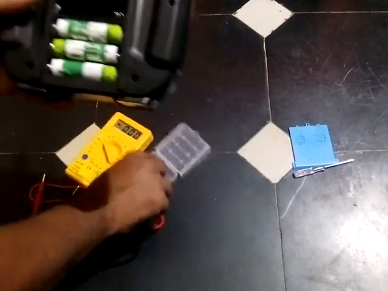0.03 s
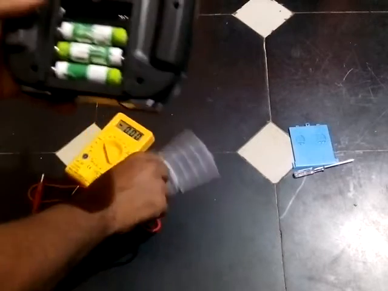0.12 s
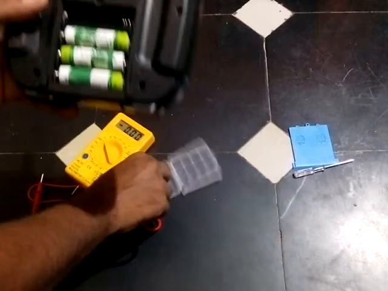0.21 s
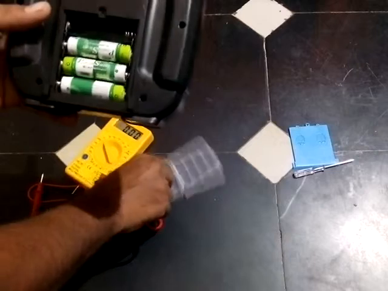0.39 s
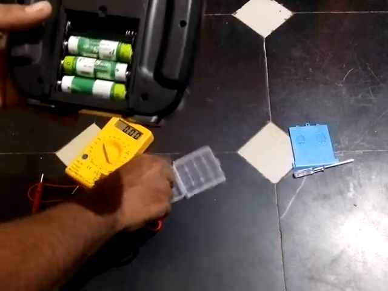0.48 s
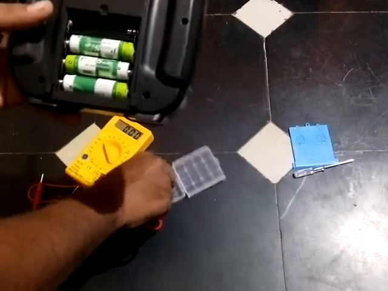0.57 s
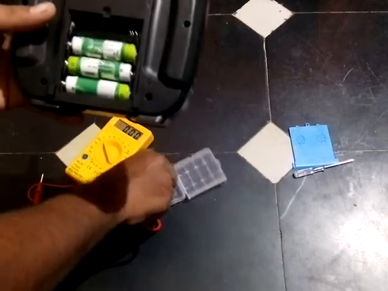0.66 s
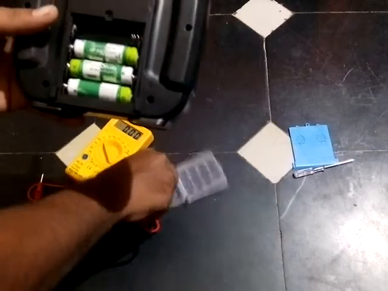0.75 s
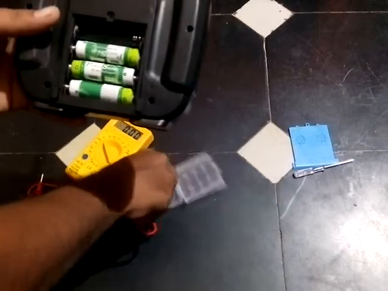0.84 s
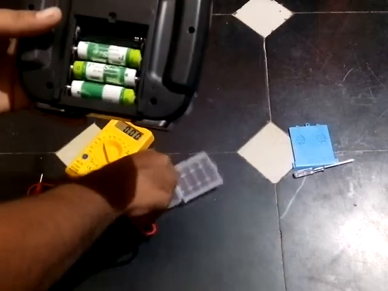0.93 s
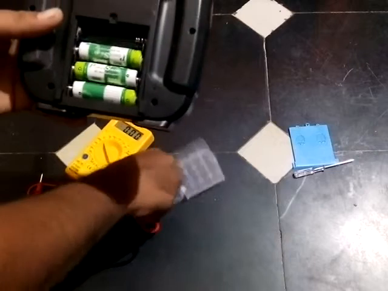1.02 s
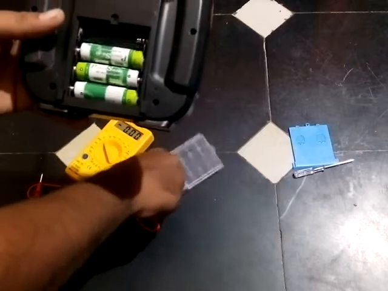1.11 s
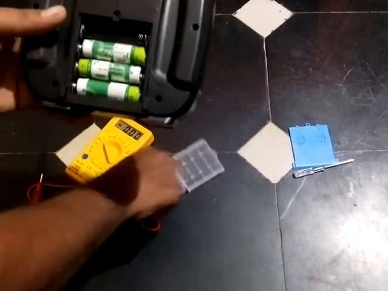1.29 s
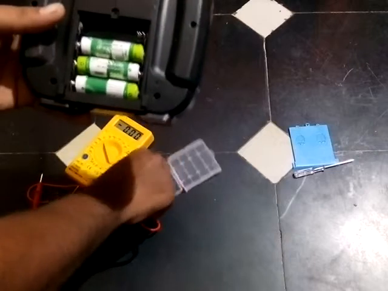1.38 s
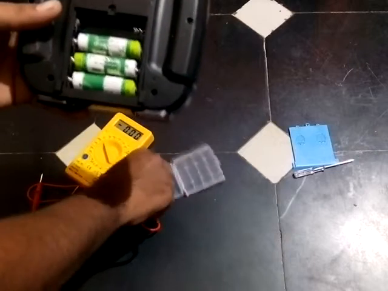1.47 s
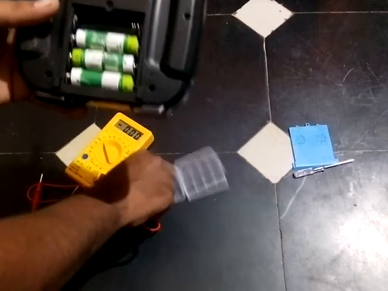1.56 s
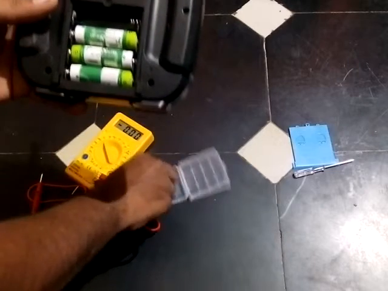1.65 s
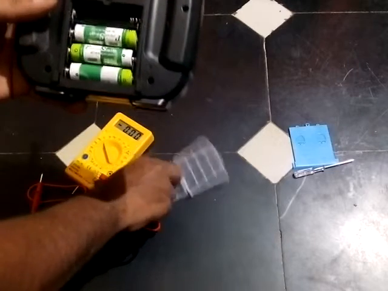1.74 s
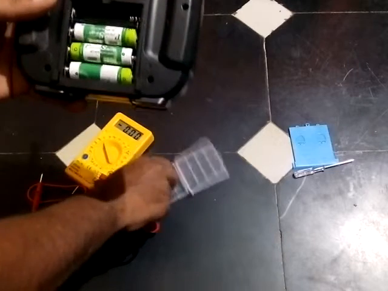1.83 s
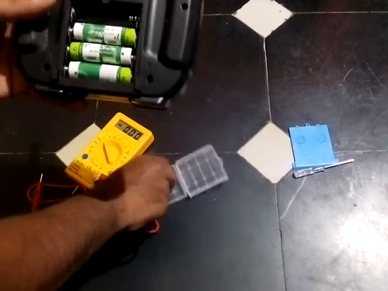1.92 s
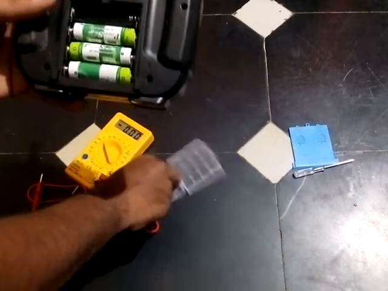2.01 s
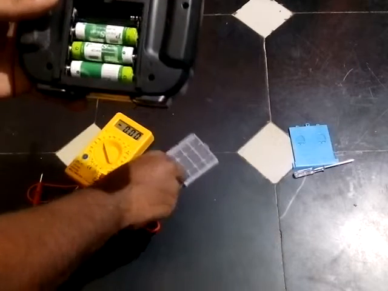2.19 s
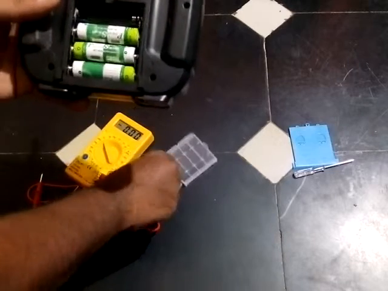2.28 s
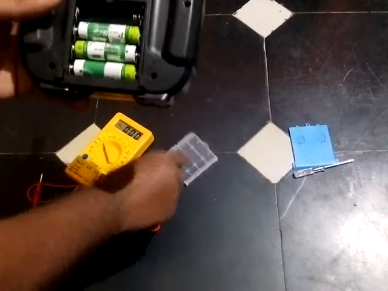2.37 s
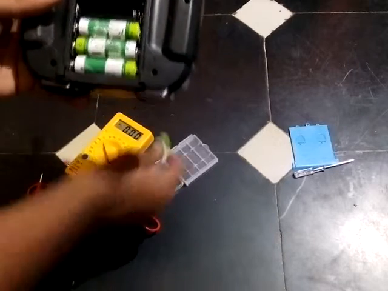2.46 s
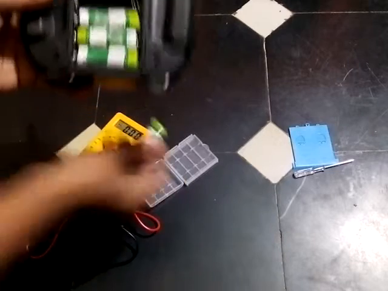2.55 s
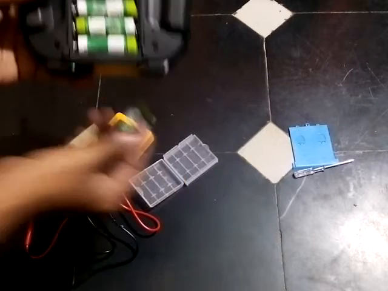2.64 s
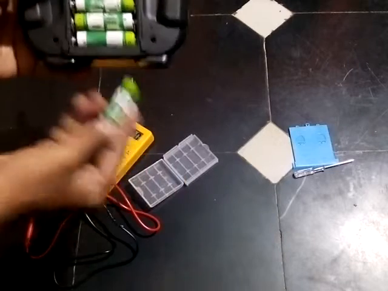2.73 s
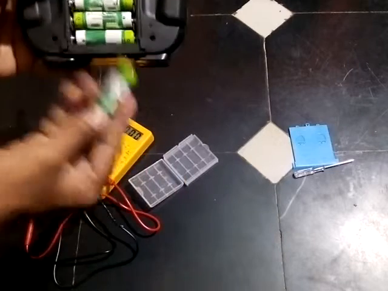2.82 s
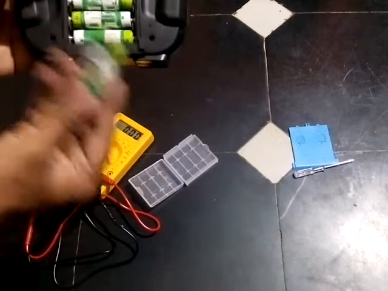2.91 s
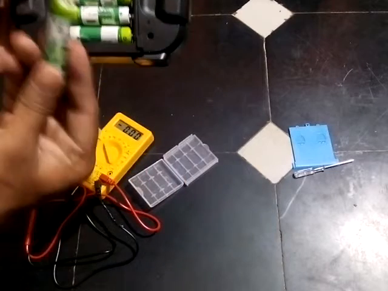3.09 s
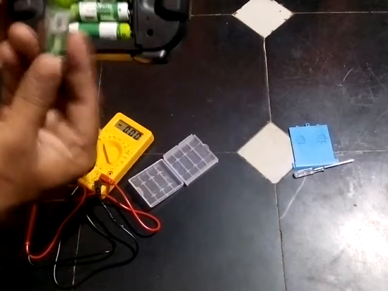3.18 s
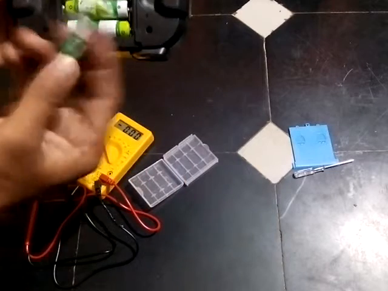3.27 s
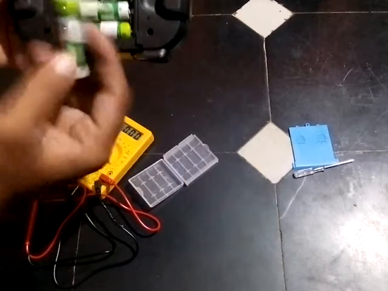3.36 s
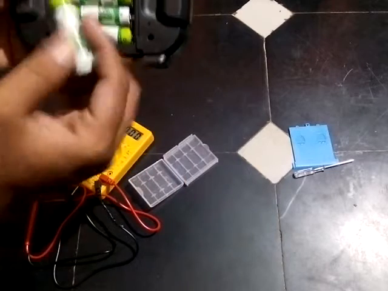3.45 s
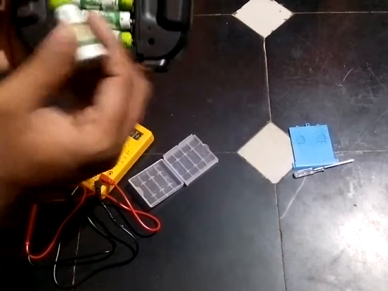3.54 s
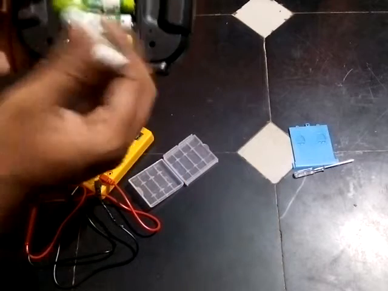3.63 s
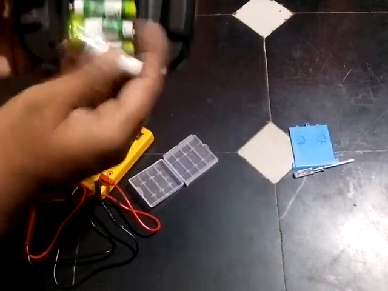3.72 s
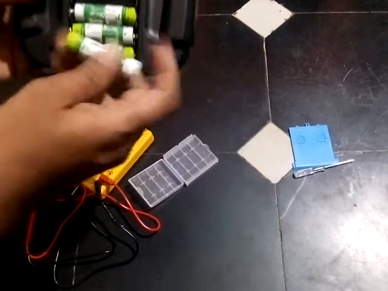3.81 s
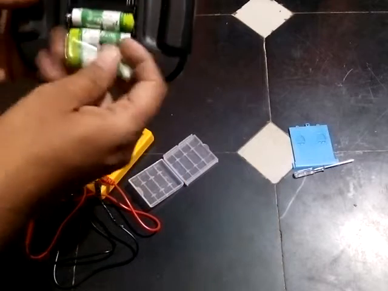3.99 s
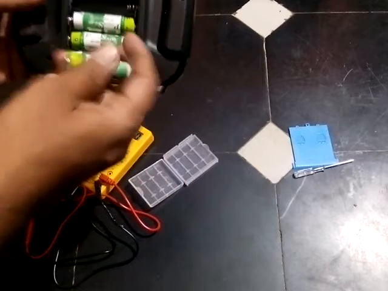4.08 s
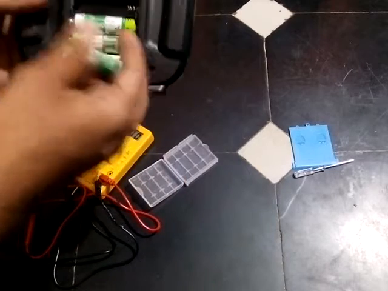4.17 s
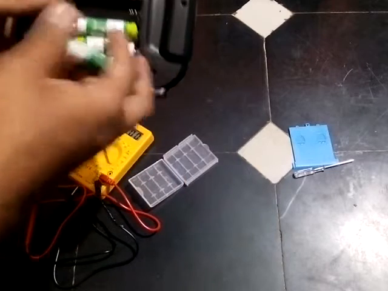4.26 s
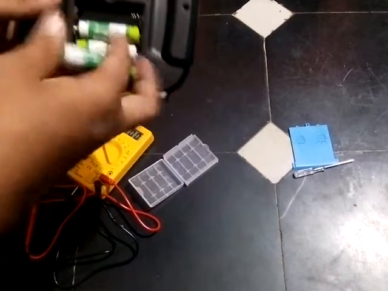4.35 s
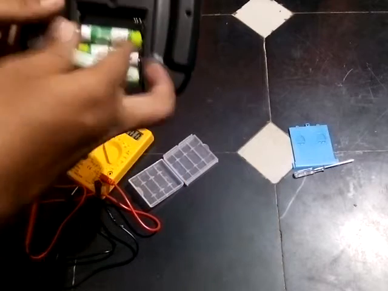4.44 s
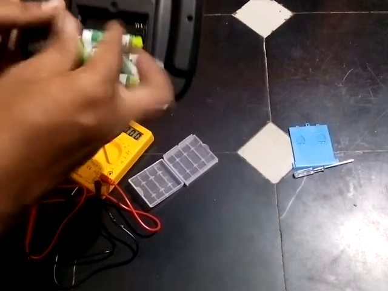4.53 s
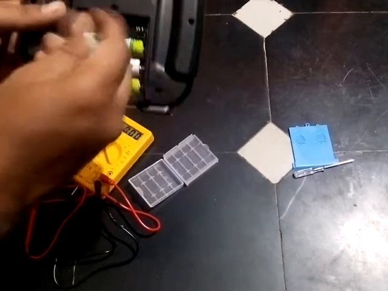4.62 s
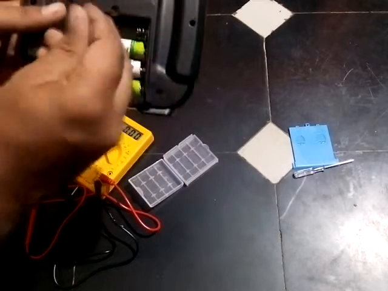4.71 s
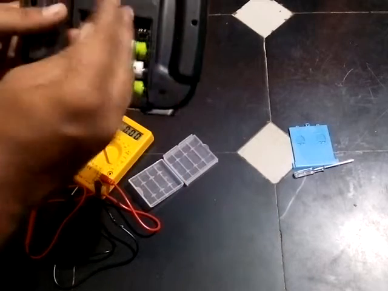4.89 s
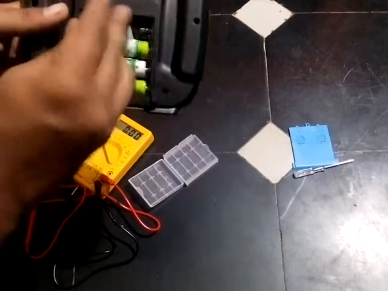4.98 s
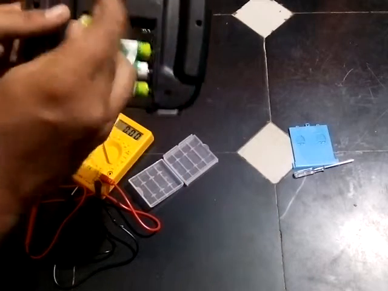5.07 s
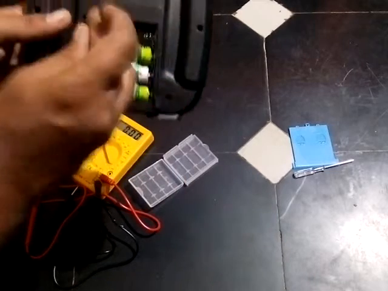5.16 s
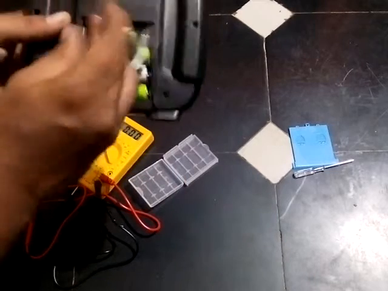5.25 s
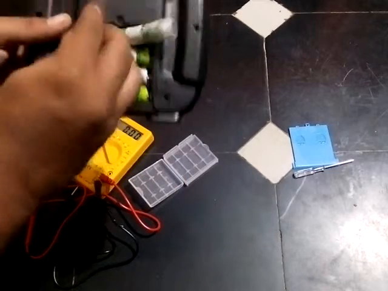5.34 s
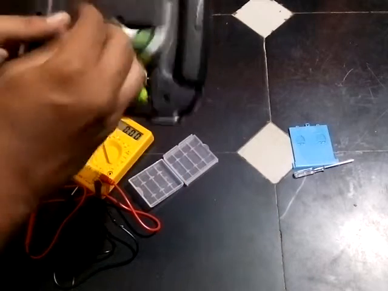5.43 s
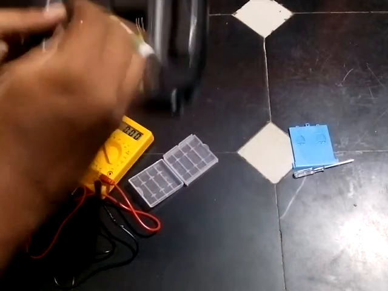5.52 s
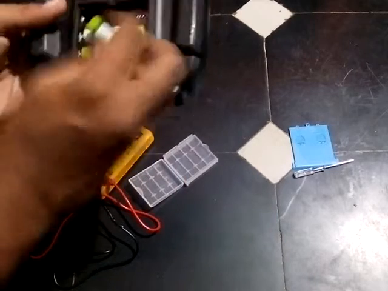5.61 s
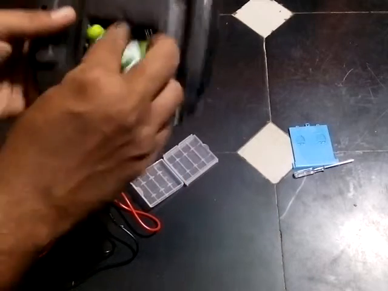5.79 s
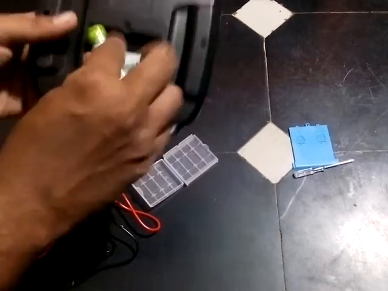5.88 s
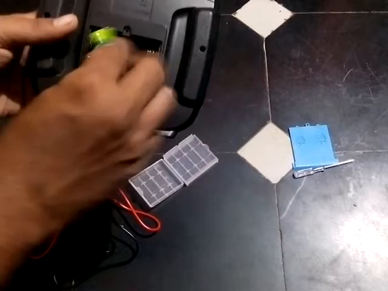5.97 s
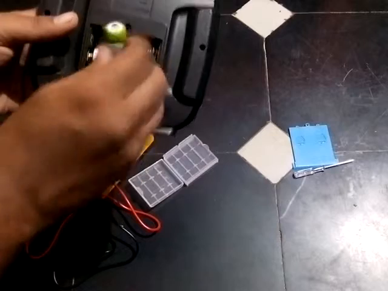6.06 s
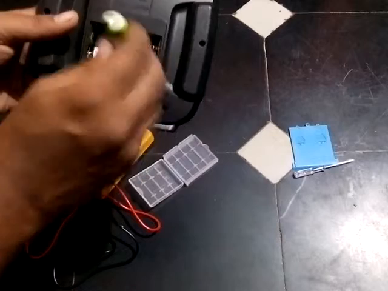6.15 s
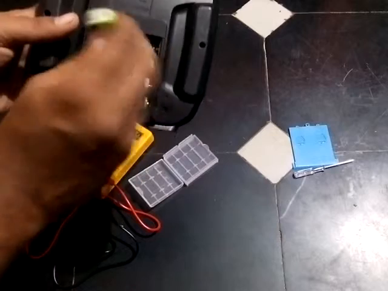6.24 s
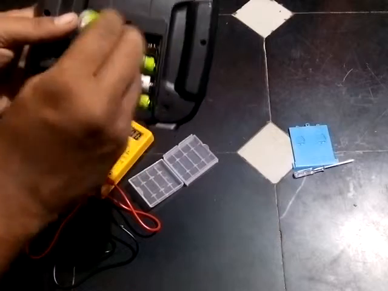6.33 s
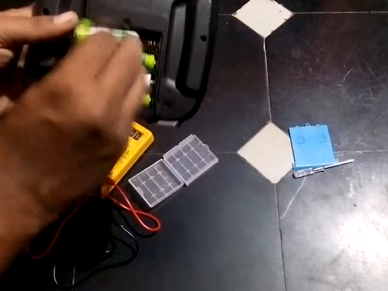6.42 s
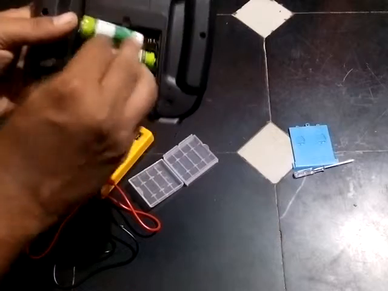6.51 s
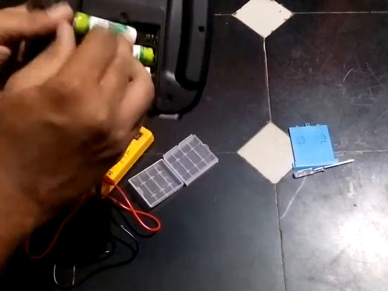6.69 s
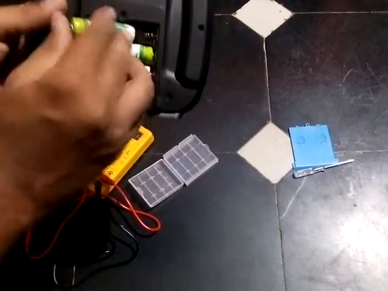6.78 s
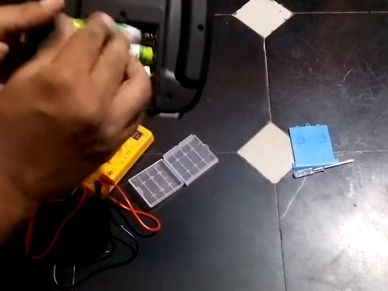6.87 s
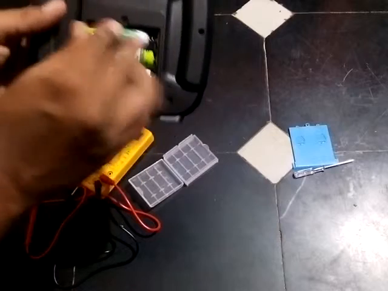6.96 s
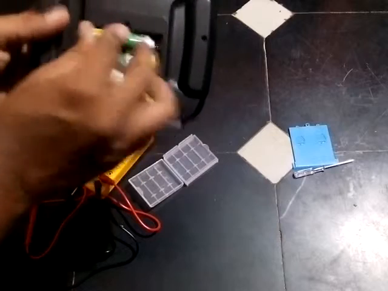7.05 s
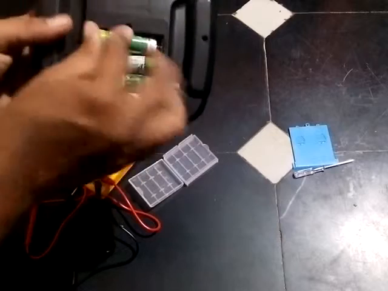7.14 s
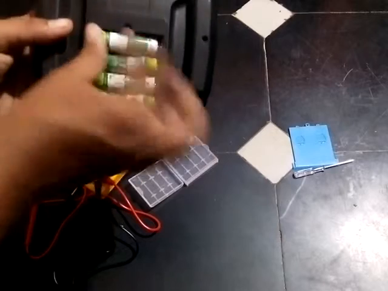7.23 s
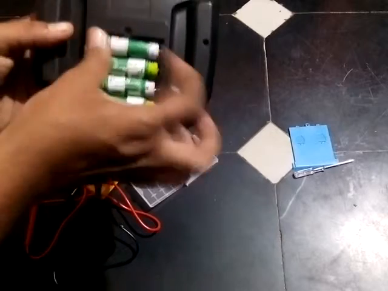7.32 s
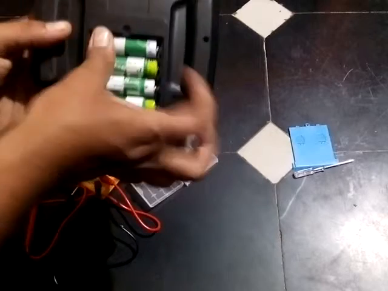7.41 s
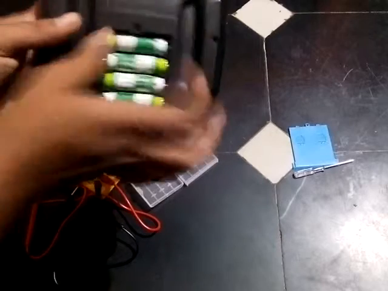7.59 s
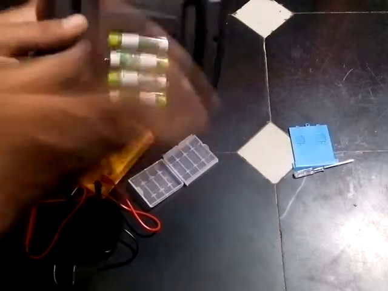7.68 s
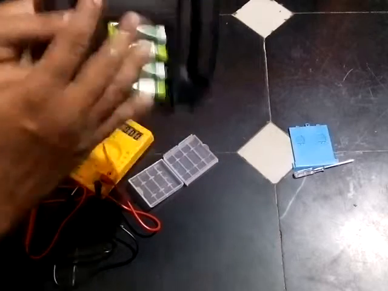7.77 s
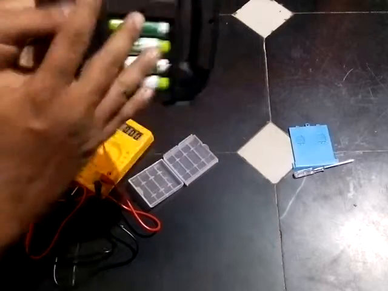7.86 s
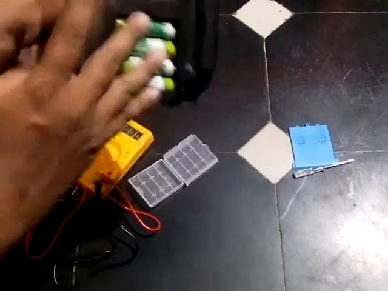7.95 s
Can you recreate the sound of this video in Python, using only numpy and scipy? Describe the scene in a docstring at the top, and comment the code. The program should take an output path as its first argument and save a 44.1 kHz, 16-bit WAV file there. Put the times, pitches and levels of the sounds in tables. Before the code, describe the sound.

Close plastic clicks and finger rubbing as a battery is picked from its case and pressed into a hand controller, over soft hiss.

```python
"""A small hard-walled room with a tiled floor, heard close up over soft hiss and a faint mains hum.
Fingers pick a battery out of a thin plastic storage case: skin rubs, the case snaps and rattles.
The battery is then pressed into the bay of a hand controller, knocking on its hollow plastic shell
and ticking on the spring contacts. A few soft bumps reach the microphone; the room answers each click."""
import sys
import numpy as np
from scipy import signal
from scipy.fft import rfft, irfft
from scipy.io import wavfile
from scipy.ndimage import uniform_filter1d

SR = 44100
rng = np.random.default_rng(int(sys.argv[2]) if len(sys.argv) > 2 else 0)


def generate_wav(sig):
    """Save sig (samples, or channels by samples) to the path in sys.argv[1] as 16-bit PCM at SR."""
    pcm = np.round(np.clip(np.atleast_2d(sig).T, -1, 1) * 32767).astype(np.int16)
    wavfile.write(sys.argv[1], SR, pcm)


N = 352800  # 8 seconds


def undb(db):
    """Decibels to gain."""
    return 10 ** (np.asarray(db) / 20)


def rms(x):
    """Root mean square."""
    return np.sqrt(np.mean(x ** 2)) + 1e-12


def fade(t, t60):
    """Exponential decay, 60 dB down after t60 seconds."""
    return np.exp(-np.log(1000) * t / t60)


def colour(x, points):
    """Shape a noise with an EQ curve of (Hz, dB) points; rms 1."""
    hz, db = np.transpose(points)
    f = np.fft.rfftfreq(x.shape[-1], 1 / SR)
    gain = undb(np.interp(np.log(f + 1), np.log(hz), db))
    shaped = irfft(rfft(x) * gain, x.shape[-1])
    return shaped / rms(shaped)


def butter(x, hz, kind, order=3):
    """Causal Butterworth filter."""
    return signal.sosfilt(signal.butter(order, hz, kind, fs=SR, output="sos"), x)


def resonate(x, hz, q):
    """One resonance, gain 1 at its centre."""
    return signal.lfilter(*signal.iirpeak(hz, max(q, 1), fs=SR), x)


def wander(rate_hz):
    """Smooth random drift with a spread near 1."""
    hold = int(SR / rate_hz)
    steps = np.repeat(rng.standard_normal(N // hold + 1), hold)
    return 1.3 * uniform_filter1d(uniform_filter1d(steps, hold), hold)[:N]


def add(track, start_s, sound):
    """Mix a sound into a track."""
    i = max(int(start_s * SR), 0)
    track[i:i + len(sound)] += sound[:max(N - i, 0)]


# EQ of the room tone, mid and side. Each row: frequency in Hz, relative level in dB.
AIR_MID_EQ = [(15, -50), (25, -11.5), (49, -15.5), (103, 2), (124, -6.5), (183, -11), (288, -14),
              (357, -17), (1050, -27.5), (1150, -27), (1430, -27), (3920, -22), (7660, -33.5), (9960, -67),
              (16900, -120)]
AIR_SIDE_EQ = [(15, -54), (25, -23.5), (48, -12.5), (96, -2), (127, -18), (357, -17), (499, -21.5),
               (1430, -28.5), (2940, -26), (4420, -17.5), (7660, -27.5), (9960, -61.5), (16900, -120)]
# Mains hum. Each row: pitch in Hz, level in dB.
MAINS_HUM = [(100, -69)]


def room_tone():
    """A wide bed of soft hiss and rumble with a wavering hum, leaning slightly left."""
    t = np.arange(N) / SR
    mid = undb(-59) * colour(rng.standard_normal(N), AIR_MID_EQ)
    side = undb(-58) * colour(rng.standard_normal(N), AIR_SIDE_EQ)
    hum = np.zeros(N)
    for hz, db in MAINS_HUM:
        amplitude = np.sqrt(2) * undb(db + 0.61 * wander(2.5))
        hum += amplitude * np.sin(2 * np.pi * hz * t + 1.3 * wander(9.2))
    return (mid + hum + np.array([side, -side])) * undb([[0.25], [-0.25]])


# EQ of the reverb tail. Each row: frequency in Hz, relative level in dB.
TAIL_EQ = [(60, -10.5), (300, 7.5), (700, -2), (1500, -1.5), (3200, -2.5), (5500, -3), (7500, -4)]


def reverb(x, tail_db, t60, low_t60, echo_s, echo_db):
    """An early echo and a smooth, diffuse tail with its own bass layer."""
    t = np.arange(SR // 2) / SR
    step = int(.25 * SR)  # drawn afresh every quarter second so that no pitch lingers
    window = signal.windows.cosine(2 * step)
    padded, out = np.pad(x, (step, 2 * step)), np.zeros(N)
    for start in range(0, N + step, step):
        noise = colour(rng.standard_normal(len(t)), TAIL_EQ)
        bass = butter(noise, 300, "low") * fade(t, low_t60)
        tail = (noise * fade(t, t60) + bass) * (1 - np.exp(-t / .0025))
        echo = rng.standard_normal(len(t)) * np.exp(-((t - echo_s) / .0013) ** 2)
        response = undb(tail_db) * tail / np.linalg.norm(tail)
        response += undb(echo_db) * echo / np.linalg.norm(echo)
        wet = signal.fftconvolve(padded[start:start + 2 * step] * window, response)
        add(out, max(start - step, 0) / SR, wet[max(step - start, 0):])
    return out


# Soft bumps. Each row: centre in seconds, level in dB, pitch in Hz, half-width in seconds.
LOW_BUMPS = [(3.454, -33, 85, .008), (3.475, -40, 54.3, 0.01), (5.368, -44, 72.6, 0.0057),
             (7.724, -48, 64.7, .04)]


def bumps():
    """Dull thumps reach the microphone, each a short swell of a low sine."""
    t = np.arange(N) / SR
    return sum(undb(db) * np.exp(-((t - s) / width) ** 2) * np.sin(2 * np.pi * hz * (t - s))
               for s, db, hz, width in LOW_BUMPS)


# Finger strokes on plastic. Each row: start in seconds, length before release in seconds, level in dB.
FINGER_STROKES = [(0, 0.097, -54), (0.21, 0.19, -58.5), (0.433, 0.8, -66.5), (1.771, 0.045, -59),
                  (2.268, 0.022, -54), (2.386, 0.04, -57.5), (2.528, 0.21, -71), (7.1, 0.22, -63.5),
                  (7.449, 0.22, -56.5), (7.766, 0.5, -59)]
# EQ of the rubbing. Each row: frequency in Hz, relative level in dB.
RUB_EQ = [(200, -2), (900, -10.5), (1700, -9), (2400, -4), (3400, 3), (4500, 1.5), (5700, 0), (7000, -16.5),
          (8000, -32)]


def fingers():
    """Skin slides over plastic in a dense stream of tiny slips, now and then catching and letting go."""
    t = np.arange(N) / SR
    attack_s, release_t60_s, catches_per_s = .0052, .3, 33
    pressure = np.zeros(N)
    for start, length, db in FINGER_STROKES:
        attack = np.clip((t - start) / attack_s, 0, 1)
        release = fade(np.maximum(t - start - length, 0), release_t60_s)
        pressure += undb(db) * attack * release
    slips = rng.standard_normal(N) * undb(3.5 * np.minimum(rng.exponential(size=N), 6))
    catches = (rng.random(N) < catches_per_s / SR) * rng.standard_normal(N) * undb(32)
    return colour(slips + catches, RUB_EQ) * pressure * undb(2 * wander(30))


# EQ of hard plastic's dry crack. Each row: frequency in Hz, relative level in dB.
CRACK_EQ = [(60, -26.5), (200, -14), (500, -20), (1000, -20), (1600, -6.5), (3100, 1), (4300, 8.5),
            (5800, 7.5), (6700, -6.5), (7600, -29)]
GRIP_T60_S, GRIP_CYCLES = .036, 50  # the longest ring the gripping hand allows


def strike(modes, contact_ms, crack_t60, chatter, crack_db=7.5):
    """One hit on plastic: a first contact and a dying chatter of tiny ones set off ring and crack."""
    t = np.arange(SR // 14) / SR
    hz, db, t60 = np.transpose(modes)[:, :, None]
    detune, spread, phase = rng.standard_normal((len(modes), 3)).T[:, :, None]
    # the hand damps the modes and shifts them from hit to hit, the high ones most
    t60 = np.minimum(t60, np.minimum(GRIP_T60_S, GRIP_CYCLES / hz))
    hz = hz * (1 + .035 * np.minimum(hz / 3000, 1) * detune)
    ring = np.sum(undb(db + 2 * spread) * fade(t, t60) * np.sin(2 * np.pi * (hz * t + phase)), axis=0)
    crack = colour(rng.standard_normal(len(t)), CRACK_EQ) * fade(t, crack_t60)
    # the contact pressure builds up, then dies away
    age = 1000 * t / max(contact_ms, .1)
    pressure = np.exp(-age) * (1 - np.exp(-2 * age))
    force = rng.standard_normal(len(t)) * pressure
    force *= chatter / np.linalg.norm(force)
    force[0] += 1 / (1 + contact_ms) ** 2  # first contact
    body = signal.fftconvolve(force, ring + undb(crack_db) * crack)[:len(t)]
    # a sliding contact keeps cracking at new spots
    scrape = colour(rng.standard_normal(len(t)), CRACK_EQ) * pressure
    return body + undb(crack_db + 4.5) * scrape


def balance(hit, db, thud_db, treble_db):
    """Mix a hit's thud, click and treble bands by the strength of their first 10 ms."""
    # a snap with hardly any thud moves only a small patch of wall, so its click band starts higher
    thinness = np.clip((-thud_db - 20) / 16, 0, 1)
    bands_hz = (90, 1450), (1470 + 1300 * thinness, 4200), (4200, 7300)
    bands = [butter(hit, edges, "band", order=5) for edges in bands_hz]
    return sum(undb(db + trim_db) * band / rms(band[:SR // 100])
               for band, trim_db in zip(bands, (thud_db, 0, treble_db)))


# Ring of the case's thin walls. Each row: pitch in Hz, level in dB, t60 in seconds before hand damping.
CASE_RING = [(196.5, -30, 0.014), (329.2, -28.5, 0.02), (1000, -10, .016), (1630, -9, 0.0127),
             (2305, -24, .01), (2873, 7, 0.0085), (3122, 2, 0.016), (3899, -12.5, 0.024),
             (4120, -2.5, .007), (5273, -6.5, 0.04), (5970, 1, 0.0065)]
# Snaps of the case; the row at 1.4322 s is the ceiling's return of the snap at 1.4156 s. Each row: start in
# seconds, click level in dB, thud and treble in dB relative # to the click, contact time in ms.
CASE_HITS = [(0.0142, -48.5, -13, -13, 1.05), (0.1215, -48, -35, -2, 10.5), (0.242, -60.5, 2, -2, 1.2),
             (0.554, -47, -20, -7.5, 0.28), (0.5924, -50.5, -9, -7.5, 2.3), (0.6573, -53, -17, 0.5, 2.9),
             (0.7477, -50, -30, -1, 0.51), (0.7538, -24.5, -31.5, -9, 0.37), (1.308, -53.5, -23, -5.5, 1.1),
             (1.321, -35, -17.5, -8.5, 0.78), (1.3278, -41, -6.5, -7, 4.8), (1.3782, -30.5, -21, 3, 0.9),
             (1.4156, -14, -21, -6.5, 1.34), (1.4322, -21, -30.5, -1.5, 2.6), (1.4456, -28.5, -14, 5, 2.5),
             (1.4837, -24.5, -22, 1.5, 1.55), (1.5786, -42.5, -21, -9, 0.2), (1.639, -48, -22, 1.5, 1.1),
             (1.8632, -27, -17, -0.5, 6.6), (2.0188, -21.5, -21.5, -17.5, .36),
             (2.098, -40, -15.5, -10, 0.39), (2.105, -33, -14, -1, 0.65), (2.1707, -44.5, -21, -7, 0.68),
             (2.3253, -48, -18.5, -15, 1.8), (2.4945, -41.5, -28, -11.5, 0.4),
             (2.5377, -42.5, -26.5, -13, 0.13), (2.5639, -33.5, -21, -4, 1.2),
             (2.6417, -42, -29.5, -14, 0.33)]


def storage_case():
    """The thin case snaps and rattles; a brighter click comes from a smaller patch and rings higher."""
    out = np.zeros(N)
    for start, db, thud_db, treble_db, contact_ms in CASE_HITS:
        click_hz = 3646 * 2 ** (treble_db / 57)  # an octave per 57 dB of treble
        hit = strike(CASE_RING, contact_ms, crack_t60=.008, chatter=.8)
        hit = hit + resonate(hit, click_hz, q=5)
        add(out, start, balance(hit, db, thud_db, treble_db))
    return out


# Ring of the hollow shell. Each row: pitch in Hz, level in dB, t60 in seconds before hand damping.
SHELL_RING = [(378, -8.5, 0.05), (452, -13.5, 0.06), (602, -4.5, 0.034), (692, -4.5, 0.045),
              (1116, -9, 0.025), (1160, 6, 0.0087), (2010, 4.5, 0.016), (2320, -2, .016), (2972, 2, 0.12),
              (3100, 10, .015), (4920, 0, 0.011), (5130, -6.5, .008), (5680, -16, .008)]


def shell_hit(db, thud_db, treble_db, contact_ms, knock_hz):
    """One hit on the controller: a click pitched by its brightness over a hollow knock."""
    click_hz = 3900 * 2 ** (treble_db / 20)  # an octave per 20 dB of treble
    hit = strike(SHELL_RING, contact_ms, crack_t60=.016, chatter=.6)
    hit = hit + 0.42 * resonate(hit, click_hz, q=6) + 2.9 * resonate(hit, knock_hz, q=3.5)
    return balance(hit, db, thud_db, treble_db)


# Battery knocking on the controller. Each row: start in seconds, click level in dB, treble in dB
# relative to the click, contact time in ms, knock pitch in Hz.
BATTERY_KNOCKS = [(3.7292, -67.5, 1, 0.81, 1250), (5.316, -33, -12.5, 1.4, 703),
                  (5.3689, -11.5, -8.5, 1.43, 1180), (5.4099, -27.5, -13, 1.2, 1200),
                  (5.5325, -52, -8, 2.4, 650), (5.5492, -26, -9, 2.1, 715),
                  (5.6003, -26.5, -5.5, 3.7, 1050), (5.6634, -36.5, -1.5, 1.56, 433),
                  (5.6927, -33, -11, 0.95, 680), (5.714, -30, -10.5, 4.8, 1250),
                  (5.88, -31.5, -6.5, 1.46, 726), (5.939, -38.5, -4.5, 4.2, 700),
                  (6.282, -43.5, -17, 0.69, 1252), (6.6798, -22, -2, 0.69, 429),
                  (6.7159, -36, -11, 6.9, 620), (6.7376, -33.5, -2, 1.15, 1180),
                  (6.771, -31, -7.5, 3.2, 652), (7.0096, -47, -4, 3, 660), (7.0343, -45, -14, 1.7, 1200),
                  (7.1199, -63, -11.5, 2.1, 580), (7.223, -51.5, 1.5, 5.6, 614),
                  (7.2909, -46, -9, 3.9, 597), (7.3384, -48, -12.5, 1.4, 610),
                  (7.498, -55.5, -11, 1.8, 637), (7.6136, -27, 4, 3.4, 318)]
# Battery ends on the spring contacts. Each row: start in seconds, click level in dB, treble in dB
# relative to the click.
CONTACT_TICKS = [(4.5187, -60, -2.5), (5.594, -39, -4), (6.1457, -53, -3.5), (7.3195, -47, -17),
                 (7.543, -51, -0.5)]
HOLLOW_HZ, HOLLOW_OCTAVES, HOLLOW_DB = 574, .31, 4.5  # knocks near the shell's main resonance gain thud


def battery_bay():
    """The battery knocks on the shell, more thud than click when it lands softly, and ticks on springs."""
    out = np.zeros(N)
    for start, db, treble_db, contact_ms, knock_hz in BATTERY_KNOCKS:
        softness_db = -33.5 - db
        hollow = np.exp(-(np.log2(knock_hz / HOLLOW_HZ) / HOLLOW_OCTAVES) ** 2)
        thud_db = .2632 * softness_db + HOLLOW_DB * hollow
        add(out, start, shell_hit(db, thud_db, treble_db, contact_ms, knock_hz))
    for start, db, treble_db in CONTACT_TICKS:
        add(out, start, shell_hit(db, thud_db=-9.5, treble_db=treble_db, contact_ms=1, knock_hz=580))
    return out


def handling():
    """All the plastic as heard from one direction; each call gives its own mix of the modes."""
    return storage_case() + battery_bay() + fingers()


def widen(left, right):
    """Wide stereo: treble flipped on the right and louder on the left, bass 3 ms late in the side."""
    pair = np.array([left, right])
    low = butter(pair, 3800, "low", order=5)
    high = butter(pair, 3800, "high", order=5) * np.array([[undb(4.0)], [-undb(-0.5)]])
    bass = butter(left + right, 500, "low", order=1)
    late_bass = np.pad(bass, (int(.003 * SR), 0))[:N]
    return low + high + 0.4 * np.array([late_bass, -late_bass])


def scene():
    """Close clicks, a reflection about a millisecond later on the left, and the room all round."""
    direct = handling()
    reflection = np.pad(butter(direct, 900, "high", order=1), (40, 0))[:N]
    # the echo heard on both sides comes off the ceiling
    room = reverb(handling(), tail_db=-8.5, t60=.29, low_t60=.098, echo_s=.018, echo_db=-7)
    left_wall = reverb(handling(), tail_db=-4, t60=.25, low_t60=.35, echo_s=.0055, echo_db=-7)
    left_wall = butter(left_wall, 1500, "high", order=1)
    left = 0.92 * direct + 1.01 * reflection + room + left_wall
    right = 1.25 * direct + room
    return widen(left, right) + bumps() + room_tone()


def record(dry):
    """The microphone overloads on the hardest clicks and cuts off steeply above 7800 Hz."""
    clipped = np.clip(dry, -.92, .92)
    return signal.sosfilt(signal.ellip(8, .2, 70, 7800, fs=SR, output="sos"), clipped)


dry = scene()
out = record(dry)
generate_wav(out)
```